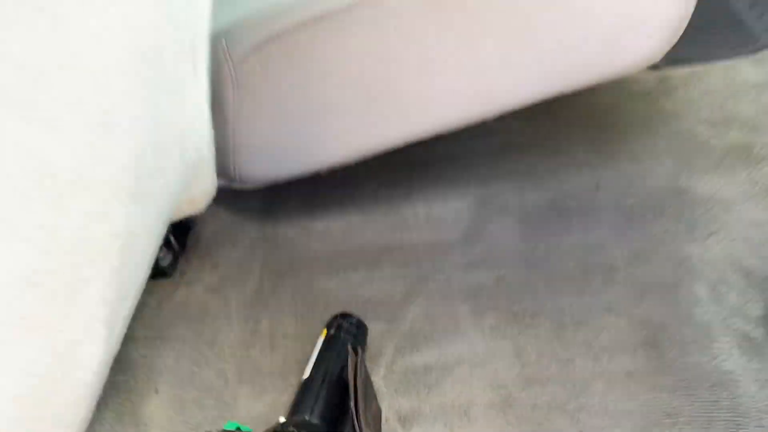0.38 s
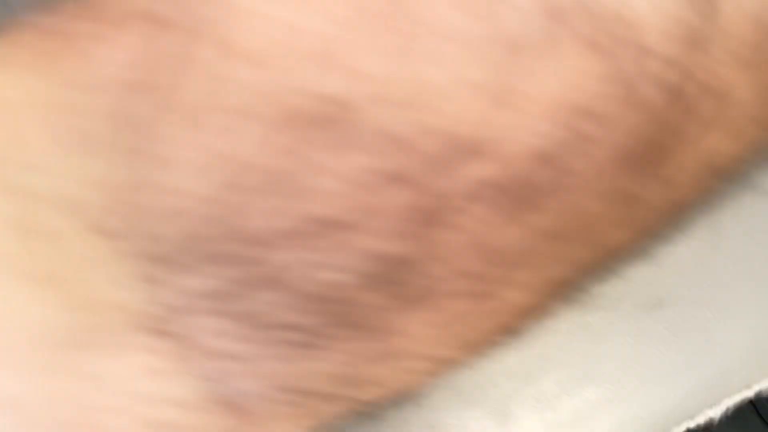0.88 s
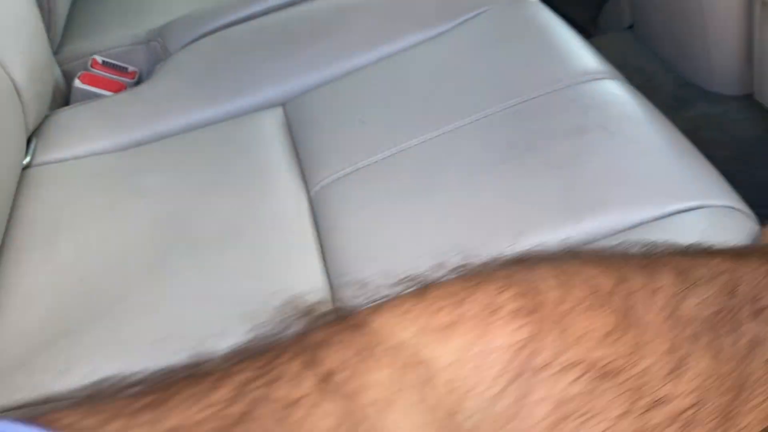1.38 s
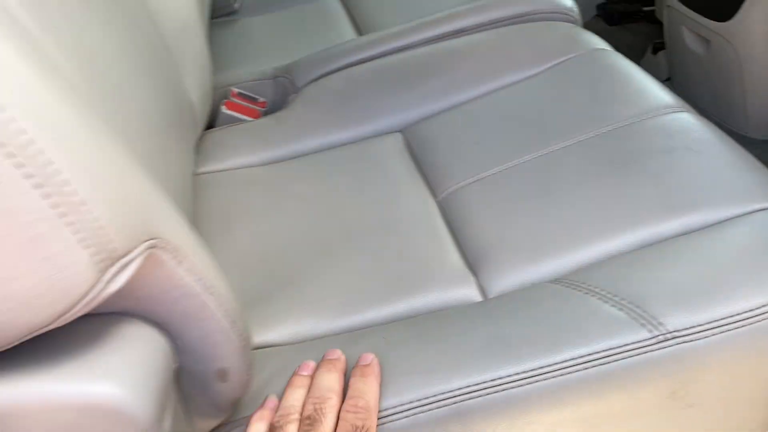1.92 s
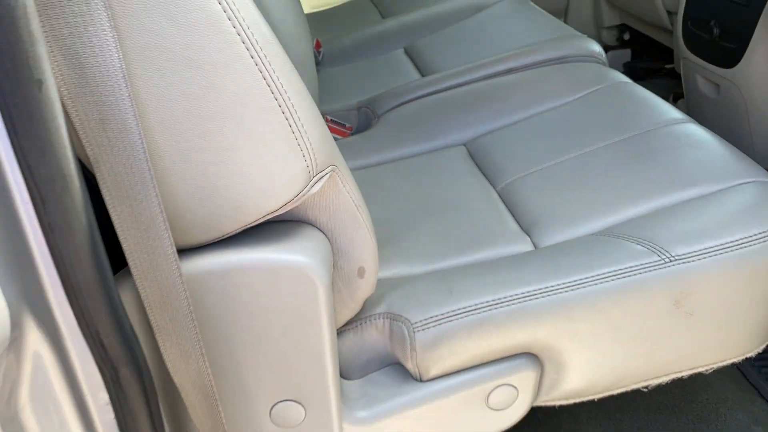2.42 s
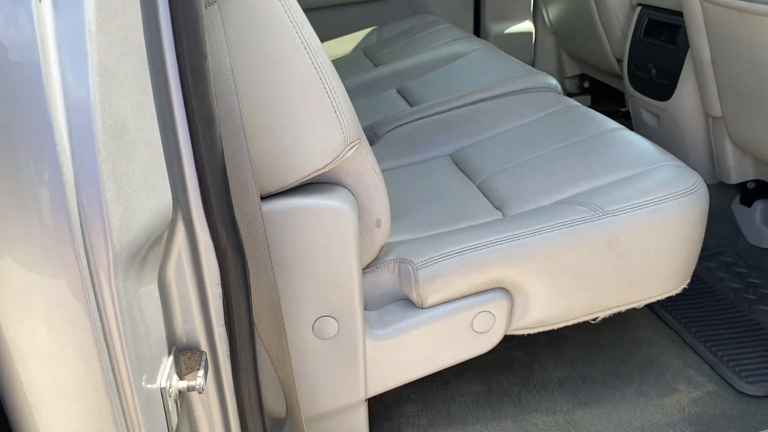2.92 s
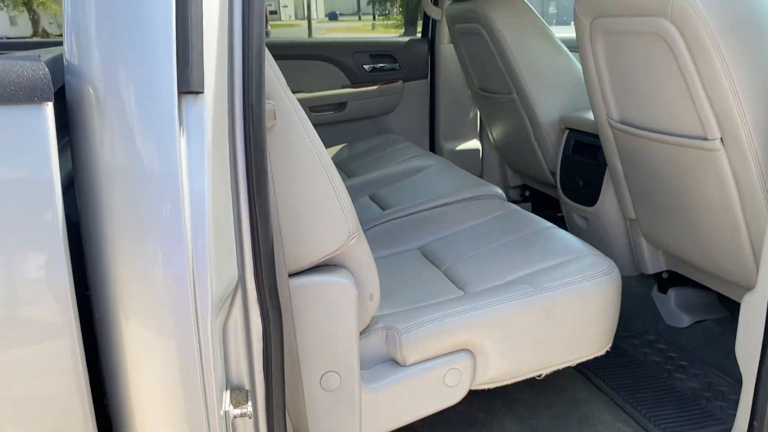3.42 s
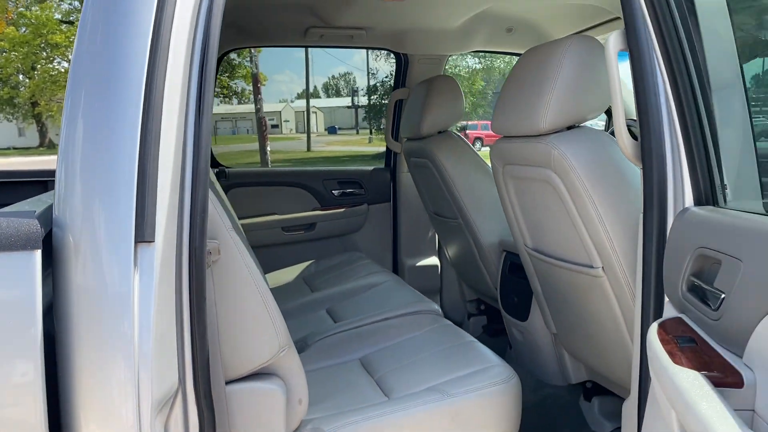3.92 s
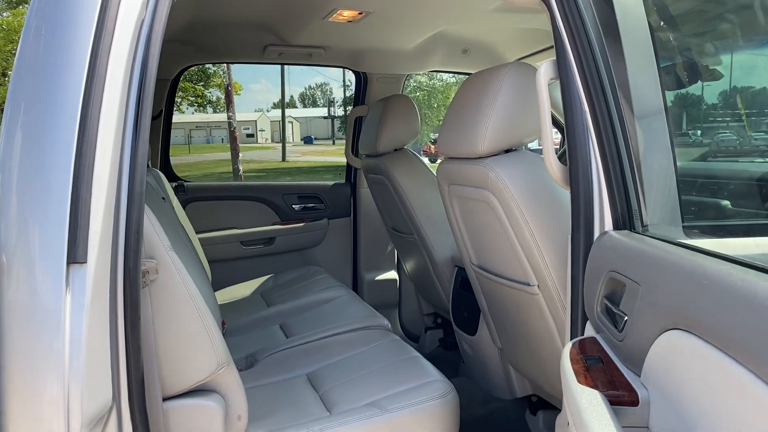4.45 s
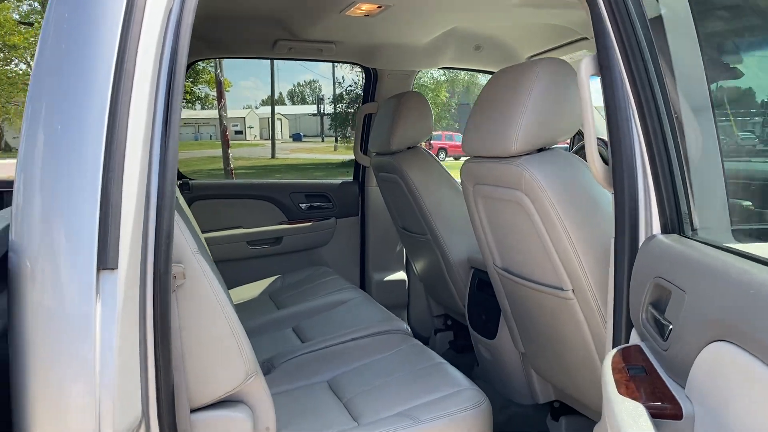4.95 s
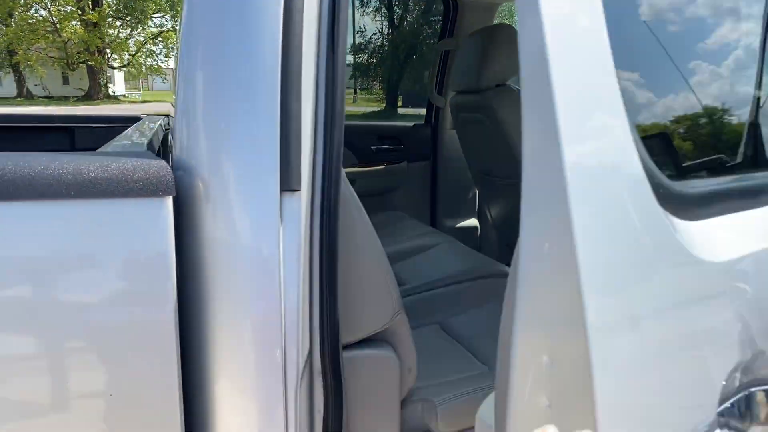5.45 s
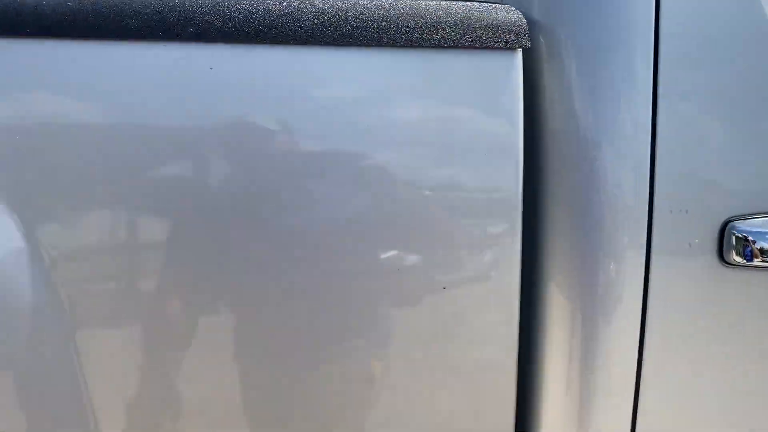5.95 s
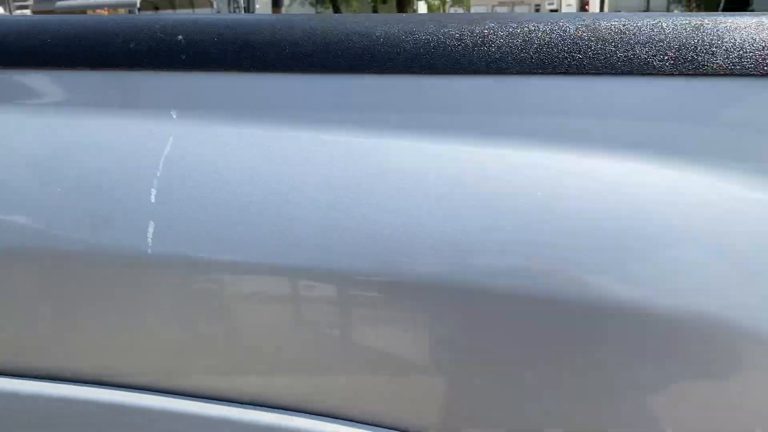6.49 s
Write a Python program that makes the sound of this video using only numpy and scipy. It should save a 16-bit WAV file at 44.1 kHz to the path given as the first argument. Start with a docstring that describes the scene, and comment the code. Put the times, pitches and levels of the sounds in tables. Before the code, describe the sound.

Rubbing hinge and clacking seat latch, a soft brush on leather, sparse gravel steps outdoors, then one heavy vehicle door slam and more scuffing steps.

```python
"""A folded truck bench is pulled down on its rubbing hinge and latches; a hand slides over the leather,
feet shift on gravel, then the heavy door slams. Rubbing is shaped noise with random catches, blows ring
the metal and rattle, and stones and leather ring for a few cycles. Outdoor air, a faint far whistle and
a low rumble lie under it; a handheld recorder with two ports limits the peaks."""
import sys
import numpy as np
from scipy import signal
from scipy.fft import rfft, irfft
from scipy.io import wavfile
from scipy.ndimage import uniform_filter1d

SR = 44100
rng = np.random.default_rng(int(sys.argv[2]) if len(sys.argv) > 2 else 0)


def store_wav(level_fs):
    """Save 16-bit WAV to argv[1]."""
    pcm = np.round(np.clip(np.atleast_2d(level_fs), -1, 1) * 32767)
    wavfile.write(sys.argv[1], SR, pcm.T.astype(np.int16))


def how_loud(loudness_db):
    """Turn decibels into a plain amplitude multiplier (0 dB gives 1, 20 dB gives 10)."""
    steps = np.asarray(loudness_db, float) / 20
    return 10 ** steps


N = 291060

# colour of a rubbing hinge: (pitch [Hz], level per Hz [dB])
HINGE_COLOUR = [(150, 2), (250, 0.5), (430, 0.5), (600, -8), (850, -13), (1400, -20.5), (2200, -18.5),
                (3200, -27), (4500, -28), (7000, -34.5), (9000, -32.5), (11500, -45.5), (14000, -50.5)]
# left-right likeness of sounds close by: (pitch [Hz], likeness [-1 to 1])
NEAR_LIKENESS = [(60, 0.99), (200, 0.85), (700, 0.35), (2000, 0.56), (4500, 0.47), (7000, 0.87),
                 (9000, 0.98)]
# left-right likeness of struck or shaken metal: (pitch [Hz], likeness [-1 to 1])
STRUCK_LIKENESS = [(60, 0.92), (200, 0.97), (700, 0.77), (2000, 0.5), (4500, 0.67), (7000, 0.97),
                   (9000, 0.93)]


def rms_one(x):
    """Scale to an rms (average strength) of 1."""
    return x / np.sqrt(np.mean(x ** 2) + 1e-20)


def in_time(rows):
    """Columns of a curve per sample; -150 outside it, which is silence for a level."""
    time_s, *columns = np.transpose(rows)
    t = np.arange(N) / SR
    return np.array([np.interp(t, time_s, c, left=-150, right=-150) for c in columns])


def at_hz(points, hz):
    """Read a table on a log-frequency axis."""
    table_hz, values = np.array(points).T
    return np.interp(np.log(hz), np.log(table_hz), values)


def drift(rate_hz):
    """Slow random wandering with spread 1, worked out at every 40th sample."""
    r = np.exp(-80 * np.pi * rate_hz / SR)
    chance = rng.standard_normal(N // 40 + 2002)
    slow = signal.lfilter([1], [1, -2 * r, r * r], chance)[2000:]   # skip the filter's start
    return np.interp(np.arange(N) / 40, np.arange(len(slow)), rms_one(slow))


def ring(clicks, hz, t60_s):
    """A unit click sets a sine of height 1 ringing; it loses 60 dB in t60_s."""
    r = how_loud(-60 / (t60_s * SR))
    w = 2 * np.pi * hz / SR
    return signal.lfilter([0, np.sin(w)], [1, -2 * r * np.cos(w), r * r], clicks + 1e-18)


def bank(envelope, spectrum, likeness, low_hz=30, size=N):
    """Half-octave bands of stereo noise above low_hz; envelope(hz) shapes what enters each band."""
    edges_hz = 32 * 2 ** np.arange(0, 9.3, .5)
    out, total = 0, 0
    white = rng.standard_normal((2, 2, size))   # neighbouring bands get unrelated noise
    for k, (low, high) in enumerate(zip(edges_hz, edges_hz[1:])):
        hz = np.sqrt(low * high)
        if hz < low_hz:
            continue
        sos = signal.butter(2, [low, high], "band", fs=SR, output="sos")
        mid, side = signal.sosfilt(sos, white[k % 2] * envelope(hz) + 1e-18)
        alike = np.clip(at_hz(likeness, hz), -1, 1)
        gain = how_loud(at_hz(spectrum, hz))
        total += gain ** 2 * (high - low) * 2 / SR
        out = out + gain * (np.sqrt(1 + alike) * mid + np.sqrt(1 - alike) * side * [[1], [-1]])
    return out / np.sqrt(total)


def grains(per_s, spread_db, smooth):
    """Gain of a rubbing contact: a steady part plus random catches that die in a few ms; rms 1."""
    strength = how_loud(spread_db * np.minimum(rng.exponential(1, N), 3))
    born = (rng.random(N) < per_s / SR) * strength
    catches = rms_one(signal.lfilter([1], [1, -.985], born))
    return rms_one(smooth + catches)


def brighter(hz, db, knee_hz):
    """A tilt that lifts the bands above the knee, fully two octaves up."""
    return how_loud(db * np.clip(np.log2(hz / knee_hz) / 2, 0, 1))


def strokes(rows, ends_s=None):
    """Gain of strokes that rise, hold and fade at steady rates in dB and add in power.
    From ends_s on, the first one loses a further 20 dB every 30 ms."""
    t, power = np.arange(N // 16 + 2) * 16 / SR, 0   # every 16th sample is enough
    for s, db, rise, hold, fade in rows:
        db = db - 20 * (np.maximum(s - t, 0) / rise + np.maximum(t - s - hold, 0) / fade)
        if ends_s and s == rows[0][0]:
            db = db - 20 * np.maximum(t - ends_s, 0) / .03
        power = power + how_loud(2 * np.maximum(db, -150))
    return np.interp(np.arange(N) / SR, t, np.sqrt(power))


def rung_once(rows, t60s, soft):
    """Each row strikes a resonance of its own through a contact soft cycles long."""
    out = np.zeros(N)
    for (s, db, hz, *_), t60 in zip(rows, t60s):
        contact = np.zeros(int(SR * t60 * 1.5))
        width = int(soft * SR / hz) + 2
        contact[:width] = np.hanning(width) / np.hanning(width).sum()
        at = round(s * SR)
        out[at:at + len(contact)] += how_loud(db) * ring(contact, hz, t60)[:N - at]
    return out


def blows(hits, modes, spectrum, ring_db, crack_db, tail_db, tail_t60, bass_longer, far_lag_s):
    """Each contact rings the modes and sets off a short crack and a longer rattle, shorter in the treble."""
    hits = np.array(hits)
    start = round(hits[0, 0] * SR) - 50
    size = min(SR, N - start)
    at = np.round(hits[:, 0] * SR).astype(int) - start

    def clicks(hz):
        """Contact strengths at one pitch."""
        train = np.zeros(size)
        bass_db = hits[:, 2] * np.clip(np.log2(500 / hz) / 2, 0, 1)
        train[at] = how_loud(hits[:, 1] + bass_db) * brighter(hz, hits[:, 3], 1040)
        return train

    def dying(hz):
        """Envelope of crack and rattle in one band; t60 [s] holds at 1 kHz."""
        longer = (1000 / hz) ** bass_longer * SR
        power = 0   # unrelated contacts add in power
        for db, t60 in ((crack_db, .013), (tail_db, tail_t60)):
            power = power + signal.lfilter([1], [1, -how_loud(-120 / (t60 * longer))], (how_loud(db) * clicks(hz)) ** 2)
        return np.sqrt(power)

    luck = rng.standard_normal((len(at), len(modes)))   # each contact excites each mode differently
    rung = np.zeros((2, size))
    for k, (hz, db, t60) in enumerate(modes):
        train = clicks(hz)
        train[at] *= how_loud(3.5 * luck[:, k]) * (-1) ** k
        rung += how_loud(db + ring_db) * ring(train, hz, t60)
    # the far (right) port hears the ring late
    rung[1] = np.interp(np.arange(size) - far_lag_s * SR, np.arange(size), rung[1])
    out = np.zeros((2, N))
    out[:, start:start + size] = rung + bank(dying, spectrum, STRUCK_LIKENESS, size=size)
    return out


def bench_drag():
    """The hinge rubs densely, the frame booms around 400 Hz and the cushion creaks around 1 kHz."""
    # tugs that free the bench:
    # (time [s], level [dB], rise [s per 20 dB], hold [s], fade [s per 20 dB])
    tug_rows = [(.112, -37, .015, .08, 1.2), (.401, -37, .005, .033, .02)]
    # the bench swinging down, then settling: (time [s], level [dB], brightness [dB], creak [dB])
    swing_rows = [(.04, -62, -14, -3), (.56, -60, 11, 5), (.66, -47, 6, 3), (.8, -49.5, 8, 9),
                  (.93, -46, 7.5, 14), (1.04, -43, 6, 2), (1.12, -36, 3, 1), (1.22, -34, 3, 6),
                  (1.26, -47, -8, 5), (1.35, -40, -16, 5), (1.39, -47, -16, 3), (1.44, -72, -4, 4)]
    size = 2 * SR
    catch = grains(260, 2.2, 1.5)[:size]
    tug = strokes(tug_rows, ends_s=.352)[:size]
    swing_db, bright_db, creak_db = in_time(swing_rows)[:, :size]

    def colour(hz):
        """Level in one band."""
        creak = np.exp(-np.log2(hz / 1150) ** 2 * 2.8)
        tugging = tug * brighter(hz, 2, 870) * how_loud(-7 * creak)
        swinging = how_loud(swing_db + creak_db * creak) * brighter(hz, bright_db, 870)
        return catch * np.hypot(tugging, swinging)

    rub = bank(colour, HINGE_COLOUR, NEAR_LIKENESS, low_hz=130, size=size)
    return np.pad(rub * how_loud([[1.8], [-1.8]]), ((0, 0), (0, N - size)))   # stronger on the left


def bench_latch():
    """A run of hard contacts rings the bench latch."""
    # contacts: (time [s], level [dB], extra bass [dB], extra treble [dB])
    latch_hits = [(1.0515, -29, 10, 16), (1.078, -15, 0, -10), (1.082, -16, 0, -6), (1.089, -16, 0, -9),
                  (1.153, -41, 2, 13), (1.163, -9, -12, -6), (1.166, -3, -13, 7), (1.170, -10, -2, 3),
                  (1.182, -22.5, 16.5, 0), (1.195, -40, 14, -8.5)]
    # ringing pitches of the latch: (pitch [Hz], level [dB], time to lose 60 dB [s])
    latch_modes = [(397, -2, 0.06), (680, -8, 0.05), (1300, -9, 0.05), (1600, 8, 0.022), (2080, -4, 0.05),
                   (3150, -4, 0.05)]
    # colour of crack and rattle: (pitch [Hz], level per Hz [dB])
    latch_colour = [(45, -3), (90, 3.5), (180, 3), (350, -2), (700, -7.5), (1400, -14), (2000, -1),
                    (2800, -20.5), (4500, -20), (7000, -28), (9000, -27.5), (11500, -37), (14000, -50.5)]
    return blows(latch_hits, latch_modes, latch_colour, ring_db=-10.5, crack_db=-1.5, tail_db=-9.5,
                 tail_t60=0.1, bass_longer=0.21, far_lag_s=0.00015)


def door_push():
    """The door comes off its stop with a muffled shudder: its hinge rubs like the bench's, but dull."""
    # (time [s], level [dB], rise [s per 20 dB], hold [s], fade [s per 20 dB])
    push_rows = [(5.367, -44, .03, .03, .06)]
    start = 5 * SR
    level = strokes(push_rows)[start:start + SR]
    rub = bank(lambda hz: level * brighter(hz, -8.0, 700), HINGE_COLOUR, STRUCK_LIKENESS, low_hz=130, size=SR)
    return np.pad(rub, ((0, 0), (start, N - start - SR)))


def door_slam():
    """A run of heavy contacts rings the door."""
    # contacts: (time [s], level [dB], extra bass [dB], extra treble [dB])
    door_hits = [(5.755, -33, -10, -10), (5.7615, 1.5, -20, -14), (5.766, -1.5, -20, -14),
                 (5.7715, -0.5, -9, 5), (5.776, -3, 4, 5), (5.783, -18, -4, -4), (5.7935, -4, 3, 3),
                 (5.799, -7.5, -3, -20), (5.806, -22, 3, 16), (5.888, -42.5, -2, 12.5)]
    # ringing pitches of the door: (pitch [Hz], level [dB], time to lose 60 dB [s])
    door_modes = [(56.6, -6, 0.4), (90, -.5, .3), (200, -2, .09), (250, -4, 0.16), (378, -3.5, 0.057),
                  (450, -6, 0.06), (545, -8, 0.1), (640, -8, 0.07), (803, 0, 0.055), (1370, -5, 0.048),
                  (2680, -21, .04), (3650, -20, 0.026)]
    # colour of crack and rattle: (pitch [Hz], level per Hz [dB])
    door_colour = [(45, -5), (90, -1), (180, -3), (350, -2), (700, -13.5), (1400, -14), (2000, -21),
                   (2800, -14.5), (4500, -27.5), (7000, -37.5), (9000, -36), (11500, -32.5), (14000, -46)]
    return blows(door_hits, door_modes, door_colour, ring_db=-5.5, crack_db=3.5, tail_db=-15.5,
                 tail_t60=0.17, bass_longer=0.35, far_lag_s=0.00007)


def thuds():
    """Dull low pushes through seat, door and ground, each a softly struck resonance."""
    # (time [s], level [dB], pitch [Hz], time to lose 60 dB [s])
    thud_rows = [(0.358, -32, 85, 0.3), (0.855, -18.5, 77.4, 0.094), (1.063, -18.5, 115, 0.2),
                 (1.099, -17.5, 78.1, 0.32), (1.183, -8.5, 105, 0.13), (1.2335, -8, 140, 0.03),
                 (1.233, -11, 88, 0.067), (1.39, -23.5, 66.5, 0.37), (1.882, -28.5, 95, 0.075),
                 (5.051, -28, 84.4, 0.27), (5.357, -33, 400, 0.07), (5.364, -28, 230, 0.1),
                 (5.376, -33, 470, 0.08), (5.385, -27, 175, 0.1), (5.742, -30, 255, 0.08),
                 (5.963, -25, 78.1, 0.19), (6.25, -28.5, 78.4, 0.17), (6.395, -24.5, 114, 0.12),
                 (6.398, -27.5, 222, 0.07), (6.475, -14, 98.6, 0.21), (6.544, -16, 69.4, 0.12)]
    return rung_once(thud_rows, [row[3] for row in thud_rows], soft=0.41)


def leather_slide():
    """Skin on leather: smooth bright friction."""
    # one long slide of the hand and three light pats:
    # (time [s], level [dB], rise [s per 20 dB], hold [s], fade [s per 20 dB])
    slide_rows = [(1.58, -41, .14, .07, .45), (2.008, -56, .025, .002, .04), (2.05, -52, .035, .002, .012),
                  (2.08, -58, .017, .002, .03)]
    # colour of the friction: (pitch [Hz], level per Hz [dB])
    leather_colour = [(700, -10), (1400, -2.5), (2000, -6), (2800, -3), (4500, -2), (7000, -4),
                      (9000, -3.5), (11500, -6.5), (14000, -15.5)]
    start = round(1.3 * SR)
    level = strokes(slide_rows, ends_s=1.97)[start:start + SR]   # then the hand leaves the seat
    rub = bank(lambda hz: level * how_loud(2.0 * drift(5.6)[:SR]), leather_colour, NEAR_LIKENESS, low_hz=400, size=SR)
    return np.pad(rub, ((0, 0), (start, N - start - SR)))


def snaps():
    """A snap is a short ring of a few cycles, a higher and shorter one above it, and a bright tick."""
    # leather and stones snapping: (time [s], level [dB], pitch [Hz])
    snap_rows = [(0.052, -41, 383), (0.518, -27, 428), (0.617, -23, 545), (0.667, -36, 1650),
                 (0.709, -27, 600), (0.743, -25.5, 810), (0.756, -30, 567), (0.774, -28, 519),
                 (0.798, -34, 800), (0.824, -35, 500), (0.867, -32, 600), (0.898, -30, 700),
                 (0.922, -29, 800), (0.955, -33, 1000), (0.977, -33, 440), (1.85, -40, 600),
                 (2.363, -40.5, 840), (3.027, -27, 1570), (3.051, -28, 890), (3.079, -35, 900),
                 (3.097, -36, 1000), (3.136, -30, 1400), (3.196, -40, 2000), (3.512, -42, 600),
                 (3.583, -42, 840), (3.612, -36, 950), (3.808, -39, 1400), (3.85, -36, 1260),
                 (3.885, -40, 1000), (4.269, -40, 930), (4.697, -33, 1010), (5.038, -32, 692),
                 (5.142, -35.5, 800), (6.295, -34.5, 950), (6.377, -39, 900), (6.445, -39, 1500),
                 (6.515, -38, 1900), (6.544, -26, 980)]
    out = rung_once(snap_rows, [13.5 / row[2] for row in snap_rows], soft=0.3)
    ratios = rng.uniform(1.4, 1.9, len(snap_rows))
    upper = [(s, db - 7, hz * ratio) for (s, db, hz), ratio in zip(snap_rows, ratios)]
    out += rung_once(upper, [12.0 / row[2] for row in upper], soft=0.28)
    for s, db, hz in snap_rows:
        at = round(s * SR)
        out[at:at + 200] += how_loud(db - 21) * rng.standard_normal(200) * np.exp(-np.arange(200) / 35)
    return out


def gravel():
    """Stones grind below 3 kHz and ring a few cycles each; the sliding sole hisses smoothly above."""
    # weight coming down on gravel:
    # (time [s], level [dB], rise [s per 20 dB], hold [s], fade [s per 20 dB])
    crunch_rows = [(2.232, -50.5, .004, .02, .1), (2.27, -48, .06, .025, .15), (2.43, -48, .04, .04, .11),
                   (2.929, -44, .006, .05, .1), (3.0, -43, .04, .03, .06), (3.06, -49, .06, .02, .35),
                   (3.338, -46.5, .1, .08, .03), (3.516, -52, .03, .002, .016),
                   (3.612, -51, .04, .002, .025), (3.67, -42, .03, .035, .06), (3.73, -49, .05, .02, .33),
                   (4.22, -49, .07, .055, .07), (5.048, -41, .07, .002, .018), (5.25, -57, .3, .14, .3),
                   (5.97, -45, .07, .185, .11), (6.3, -54.5, .2, .2, .1), (6.544, -37, .03, .008, .06),
                   (6.6, -39, .06, .002, .05)]
    # the sole sliding over it:
    # (time [s], level [dB], rise [s per 20 dB], hold [s], fade [s per 20 dB])
    scuff_rows = [(2.233, -43, .005, .002, .063), (2.93, -39, .01, .075, .05), (3.338, -44, .04, .08, .2),
                  (3.52, -49.5, .1, .08, .15), (3.67, -37, .04, .015, .045), (4.2, -51, .05, .002, .11),
                  (5.0, -56, .1, .08, .15), (5.944, -44, .007, .002, .13), (6.18, -41, .04, .002, .08),
                  (6.304, -46, .12, .002, .42), (6.544, -37, .04, .002, .06)]
    # colour of grinding and hiss: (pitch [Hz], level per Hz [dB])
    gravel_colour = [(250, -8), (350, -5), (700, -1), (1400, -4), (2000, -11), (2800, -18.5), (4500, -23),
                     (7000, -23.5), (9000, -17), (11500, -22), (14000, -27.5)]
    crunch = strokes(crunch_rows)
    grind = crunch * grains(200, 4.0, 1.4)
    hiss = strokes(scuff_rows) + 0.22 * grind
    start = 2 * SR   # no step falls earlier
    noise = bank(lambda hz: (grind if hz < 3000 else hiss)[start:], gravel_colour, NEAR_LIKENESS,
                 low_hz=240, size=N - start)
    noise = np.pad(noise, ((0, 0), (start, 0)))
    strength = how_loud(2.0 * np.minimum(rng.exponential(1, N), 3))
    knocks = (rng.random(N) < 260 / SR) * strength * rng.choice([-1, 1], N)
    dealt = rng.integers(0, 10, N)   # which of ten stones is knocked
    pitches_hz = np.geomspace(600, 2600, num=10)
    stones = [ring(knocks * (dealt == k), hz, 12.0 / hz) for k, hz in enumerate(pitches_hz)]
    # one stone is nearly missing on the left, another a little weaker on the right
    sides = np.array([sum(stones) - 0.96 * stones[7], sum(stones) - 0.13 * stones[2]])
    return how_loud(-3.8) * noise + how_loud(-7.5) * crunch * rms_one(sides)


def scrapes():
    """A stone drags under the sole: uneven slips pass twice through one resonance and sing near its pitch."""
    # (time [s], level [dB], length [s], pitch [Hz])
    scrape_rows = [(2.262, -50, .04, 1020), (2.95, -52, .09, 1600), (3.06, -52, .1, 850),
                   (3.675, -48, .03, 950), (5.955, -49, .05, 2250), (5.97, -47, .09, 830),
                   (6.075, -48, .09, 1000), (6.08, -53, .11, 2450), (6.535, -48, .03, 2400),
                   (6.535, -42, .03, 900)]
    edge = .03   # rise and fade [s per 20 dB]
    slips = grains(400, 3.0, .6) * rng.standard_normal((2, N))
    slips[1] = .7 * slips[0] + .7 * slips[1]   # the ports hear partly the same slips
    out = 0
    for s, db, length, hz in scrape_rows:
        b, a = signal.iirpeak(hz, 1 / .3, SR)   # each pass is 0.3 of the pitch wide
        sung = rms_one(signal.lfilter(b, a, signal.lfilter(b, a, slips)))
        out = out + sung * strokes([(s, db, edge, length, edge)])
    return out


def rumble():
    """Wind and the hand on the recorder: lumpy low noise, nearly alike in both ports, with gusts."""
    # gusts over the steady bed: (time of the peak [s], level [dB], fade [s per 20 dB])
    gust_rows = [(0.155, -42, .13), (0.37, -39, .15), (0.534, -38, .07), (0.692, -42, .15),
                 (0.875, -26, .08), (0.95, -39, .2), (1.06, -33, .06), (1.26, -23, .1), (1.38, -33, .3),
                 (1.58, -34, .25), (1.68, -33, .1), (1.9, -39, .1), (2.14, -45, .12), (2.4, -49, .6),
                 (2.75, -45, .5), (3.12, -41.5, .35), (3.32, -44.5, .4), (3.69, -46, .4), (4.11, -48, .3),
                 (4.34, -41, .07), (4.54, -43.5, .15), (4.87, -45, .08), (5.07, -37.5, .35),
                 (5.45, -40, .45), (5.66, -42, .15), (5.75, -38, .1), (5.905, -26, .08), (5.98, -27, .1),
                 (6.04, -28, .08), (6.268, -41, .1), (6.424, -28, .07), (6.52, -30.5, .4)]
    sos = signal.butter(2, [42, 108], "band", fs=SR, output="sos")
    lumpy = rng.standard_normal((2, N)) * how_loud(0.96 * drift(14.5))
    mid, side = rms_one(signal.sosfilt(sos, lumpy))
    gusts = strokes([(s, db, .6 * fade, 0, fade) for s, db, fade in gust_rows])   # builds up faster than it fades
    bed = how_loud(-51 + 1.5 * drift(4.0))
    level = uniform_filter1d(np.hypot(bed, gusts), size=900)
    return level * (mid + how_loud(-15.5) * side * [[1], [-1]])


def far_whistle():
    """A faint far whistle: noise passed twice through a narrow resonance."""
    # (time [s], level [dB], rise [s per 20 dB], hold [s], fade [s per 20 dB])
    whistle_rows = [(0.001, -65, .01, .08, .06), (2.17, -62, .07, .19, .055)]
    b, a = signal.iirpeak(1847, 1847 / 73, SR)   # at 1847 Hz, each pass 73 Hz wide
    tone = signal.lfilter(b, a, signal.lfilter(b, a, rng.standard_normal((2, N))))
    return strokes(whistle_rows) * rms_one(tone)


def air():
    """Outdoor air: a hush of noise bands, each wavering a little."""
    # air as the recorder moves out of the cab: (time [s], level [dB], brightness [dB])
    outdoor_rows = [(0, -65, -7), (.1, -53.5, -9), (1.3, -58, -2), (2.15, -58.5, -2.5), (2.8, -59.5, 0),
                    (4, -58, 0), (4.6, -56, -1.5), (5.7, -54.5, -2.5), (6.6, -58.5, 3)]
    # colour of the air: (pitch [Hz], level per Hz [dB])
    air_colour = [(45, -4), (90, -2), (180, -11), (350, -15), (700, -15), (1400, -23), (2000, -19.5),
                  (2800, -25.5), (4500, -27.5), (7000, -32), (9000, -32), (11500, -38.5), (14000, -42.5)]
    # left-right likeness before the port lag: (pitch [Hz], likeness [-1 to 1])
    far_likeness = [(60, .92), (140, 0.73), (330, 0.4), (800, -.1), (1800, 0.07), (4000, 0.41),
                    (7000, 0.63), (9000, 1)]
    level_db, bright_db = in_time(outdoor_rows)
    level_db = level_db + 0.45 * drift(0.86)

    def wavering(hz):
        """Level in one band."""
        return how_loud(level_db + 1.1 * drift(10.5)) * brighter(hz, bright_db, 1500)

    return bank(wavering, air_colour, far_likeness, low_hz=150)


def scene():
    """All sources at the two ports."""
    bench = bench_drag() + bench_latch()
    door = door_push() + door_slam()
    touches = thuds() + leather_slide() + snaps()
    feet = gravel() + scrapes()
    return bench + door + touches + feet + rumble() + far_whistle() + air()


def low_pass(x):
    """Removes everything above the highest recorded frequency."""
    return signal.sosfilt(signal.butter(12, 16600, fs=SR, output="sos"), x)


def record(dry):
    """Port lag and balance, cuts at both ends, a limiter that ducks after loud blows, soft overload."""
    # the two ports favour different pitches: (pitch [Hz], left minus right [dB])
    port_balance = [(200, 0), (600, -1), (1200, -2), (2200, -1.5), (4500, 1.3), (10000, 0.2)]
    hz = np.fft.rfftfreq(N, 1 / SR)
    # the lag sets in above 6890 Hz, where the left port falls behind the right
    port_lag_s = 0.00023
    turn = np.pi * port_lag_s * np.maximum(hz - 6890, 0)
    lag = np.exp(1j * turn * [[-1], [1]])
    balance = how_loud(at_hz(port_balance, hz + 1) * [[.5], [-.5]])
    cuts = (hz < 15800) / np.sqrt(1 + (32 / (hz + 1e-9)) ** 6)
    x = irfft(rfft(dry) * lag * balance * cuts, N)

    limit_db = -14
    loudness = uniform_filter1d(np.abs(x).max(axis=0), size=200)
    over_db = np.maximum(20 * np.log10(loudness + 1e-9) - limit_db, 0)
    # the highest excess is remembered and shrinks by 79 dB a second
    ramp = 79 * np.arange(N) / SR
    held_db = np.maximum(np.maximum.accumulate(over_db + ramp) - ramp, 0)
    x = x * how_loud(-.3 * uniform_filter1d(held_db, size=300))   # turn down by 0.3 of the excess
    mix = 0.96 * np.tanh(x / 1.04)
    return low_pass(mix)


dry = scene()
out = record(dry)
store_wav(out)
```